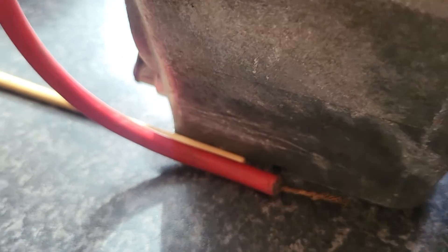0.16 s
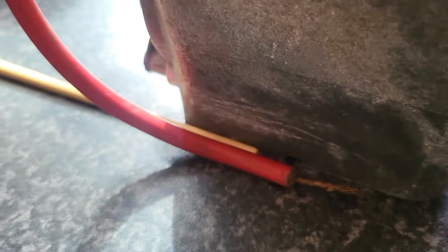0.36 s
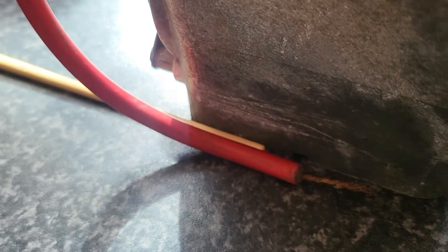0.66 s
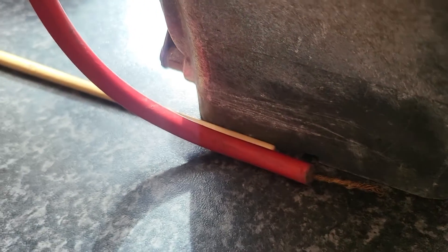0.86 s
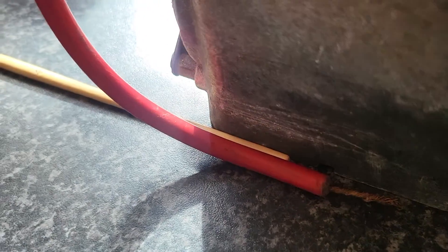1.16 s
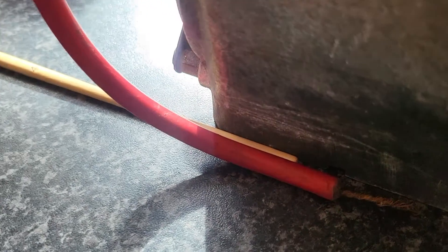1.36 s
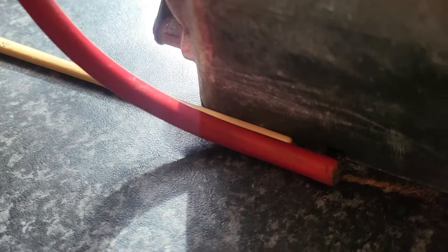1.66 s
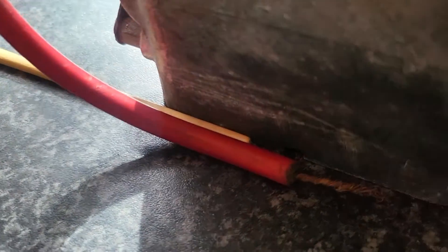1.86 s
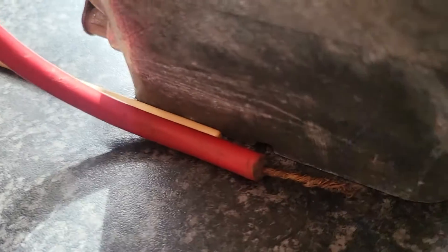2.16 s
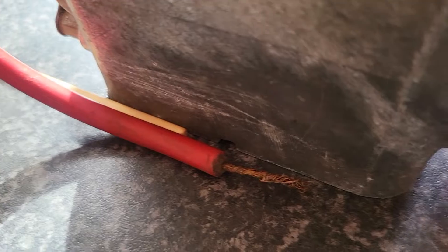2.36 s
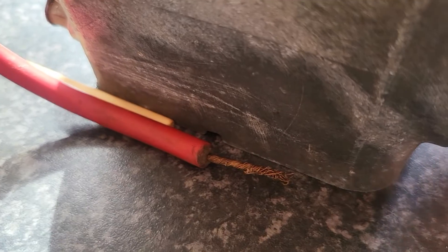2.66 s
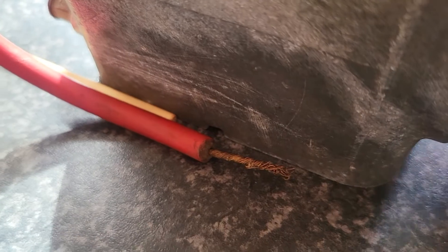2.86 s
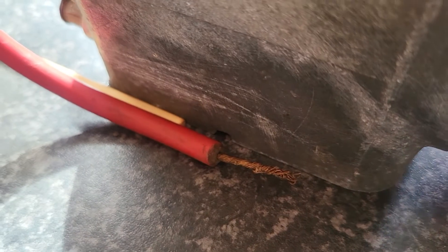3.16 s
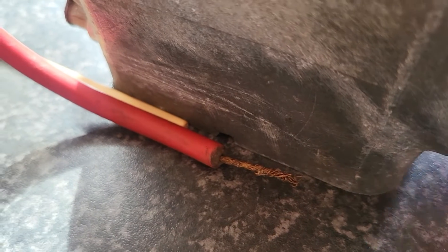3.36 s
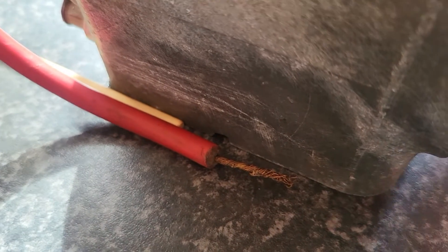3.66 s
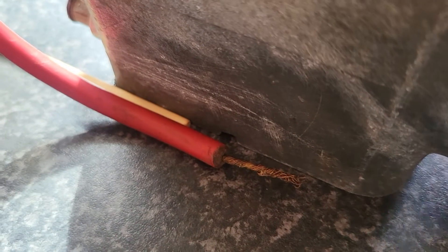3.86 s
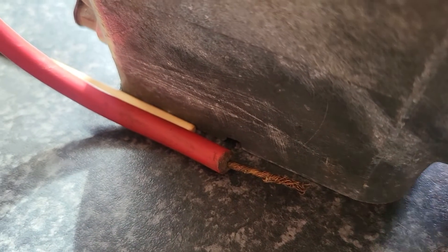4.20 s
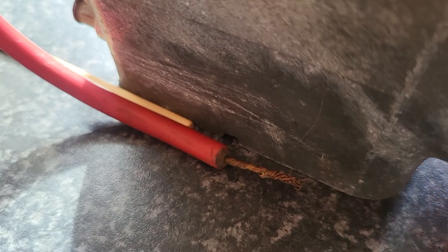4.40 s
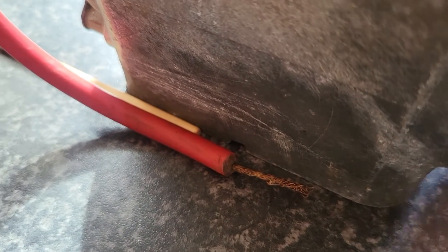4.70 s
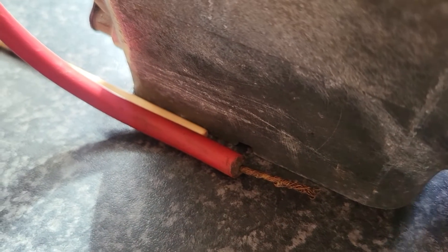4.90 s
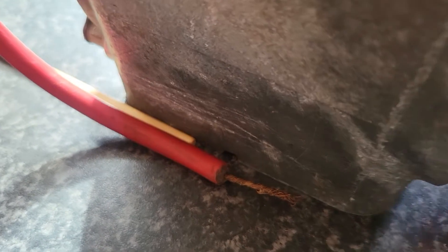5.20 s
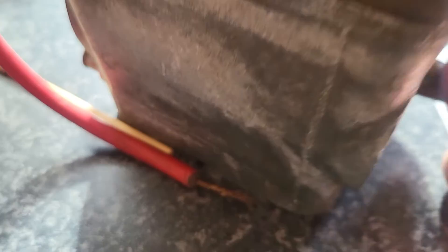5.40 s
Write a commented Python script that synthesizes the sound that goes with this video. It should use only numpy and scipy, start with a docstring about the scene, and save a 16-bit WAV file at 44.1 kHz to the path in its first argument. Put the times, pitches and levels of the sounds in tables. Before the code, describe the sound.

Very close to the microphone, a magneto is turned by hand on a bench in short rasping pushes, about three a second. Gear ticks come first; from 0.9 seconds nearly every push ends with a small breaker click and a hard, bright spark crack. Low thuds follow, some bumping the microphone, over faint room rumble and a short room tail.

```python
"""A magneto is turned by hand on a workbench, close to a phone. Over a low room rumble, each push of
the hand excites slip noise and housing modes, and a faint drone grows; gear teeth and breaker tick.
As the armature flips, a spark cracks across a small gap between lead and housing: a shock front,
scattered noise and a bark. Some sparks jolt the microphones into a brief low swing, while decaying
bench modes thud. The small room answers ticks and sparks with a short decaying noise tail."""
import sys
import numpy as np
from scipy import signal
from scipy.fft import rfft, irfft
from scipy.io import wavfile
from scipy.ndimage import uniform_filter1d

SR = 44100
rng = np.random.default_rng(int(sys.argv[2]) if len(sys.argv) > 2 else 0)


def master(y):
    """Save y as 16-bit WAV."""
    cut = np.clip(np.atleast_2d(y).T, -1, 1)
    pcm = np.round(cut * 32767)  # scale
    wavfile.write(sys.argv[1], SR, pcm.astype(np.int16))


N = 244314  # length in samples

# Pushes of the hand: start t/s, spin-up t/s, held t/s, run-down t/s, gear rub level/dB,
# dry sliding hiss level/dB
PUSHES = [(0.0, 0.045, 0.048, 0.34, -41.5, -62.5), (0.37, 0.062, 0.089, 0.2, -41.5, -64.5),
          (0.699, 0.054, 0.063, 0.27, -40, -52.5), (1.038, 0.061, 0.055, 0.24, -42.5, -58),
          (1.409, 0.07, 0.024, .38, -42, -56), (1.816, 0.08, 0.005, 0.39, -42.5, -58),
          (2.21, 0.098, 0.041, 0.28, -49, -66), (2.55, 0.077, 0.017, 0.24, -47, -56.5),
          (2.73, 0.063, 0.15, 0.36, -70.5, -68), (2.921, 0.095, 0.07, 0.28, -46, -56.5),
          (3.282, 0.11, 0.021, .33, -44.5, -55), (3.62, 0.091, 0.024, 0.36, -46, -53.5),
          (3.98, 0.087, 0.03, 0.39, -43.5, -53), (4.308, 0.07, 0.079, 0.29, -44.5, -56.5),
          (4.654, 0.055, 0.14, 0.29, -46, -59), (5.064, 0.045, 0.065, 0.39, -41, -51),
          (5.36, 0.11, 0.038, .2, -48.5, -59.5)]
RUB_POWER, HISS_POWER = 2.43, 2.3  # amplitude grows as speed to this power
REST_SPEED = 0.022  # fraction of full speed; the armature never quite stands still
# Extra rub as the poles resist before a flip: level/dB, build-up t/s, release t/s
MAGNET_DB, MAGNET_S, RELEASE_S = 9, 0.059, 0.0058
FIRM_DB = -42  # gear rub of a firm push, level/dB

# Housing resonances: f/Hz, nominal width f/Hz, relative level/dB, left minus right level/dB
HOUSING_MODES = [(672.5, 40, 7.5, -0.5), (880, 87, 1.5, 5.5), (998, 50, 6.5, 0), (1207, 400, -4.5, -0.5),
                 (1445, 100, -7, -2.5), (1865, 200, -3, 11.5), (2041, 340, -2.5, 2), (2540, 190, -14, -4.5),
                 (2618, 120, -7.5, 3.5)]
# Spectrum of the gear and bearing rub: f/Hz, level/dB
RUB_SPECTRUM = [(100, -4), (300, -2.5), (500, 0.5), (800, 1.5), (1300, -5.5), (1620, -8), (2300, -9.5),
                (3000, -18.5), (4500, -23), (9000, -45.5)]
# Spectrum of the dry sliding hiss: f/Hz, level/dB
HISS_SPECTRUM = [(1500, -7.5), (3200, -2.5), (5000, -8), (7400, -4.5), (9000, -16), (12000, -12),
                 (15500, -17), (16500, -31.5)]
# Spectrum of the room rumble: f/Hz, level/dB
AIR_SPECTRUM = [(20, -11), (50, 1.5), (110, 0), (200, -11), (350, -15.5), (700, -22.5), (1200, -36),
                (3000, -36), (8000, -47.5), (15500, -49.5)]

# Gear teeth taking up their slack: t/s, snap level/dB, housing knock level/dB
GEAR_TICKS = [(0.199, -8, -7.5), (0.382, -38, -2.5), (0.43, -8.5, -32), (0.450, -34, -1), (0.550, -6, -4.5),
              (0.711, -29, -1.5), (0.781, -33.5, 2.5), (1.395, -17.5, -18.5), (4.526, -6.5, -9.5)]
# The breaker snaps once before each spark, earlier when the hand pauses in between: t/s
BREAKER_SNAPS = [0.845, 1.157, 1.508, 1.884, 2.149, 2.625, 3.06, 3.406, 3.735, 4.064, 4.28, 4.874, 5.211,
                 5.47]
BREAKER_SNAP_DB, BREAKER_KNOCK_DB = -2, -3  # relative level/dB under a firm push
SNAP_PER_PUSH, KNOCK_PER_PUSH = 0.53, 0.8  # dB per dB of the push
# Spectrum of the snap: f/Hz, level/dB
SNAP_SPECTRUM = [(1500, -12.5), (3500, -29.5), (5000, 9.5), (6400, 4), (7500, 7.5), (9000, -17.5),
                 (12000, -9.5), (16000, -15)]
# Spectrum of the room's answer: f/Hz, level/dB
ROOM_SPECTRUM = [(150, 0), (500, -2.5), (1000, -11), (2000, -7), (4000, -5.5), (7000, -1.5), (9000, -7.5),
                 (13500, -1), (15500, -10), (16500, -28)]

# Sparks: t/s, crack level/dB, extra treble level/dB, bark of the gap level/dB, bark f/Hz, # bench knock
# level/dB, left minus right level/dB, bench thud level/dB (levels relative)
SPARKS = [(0.9030, -4.5, -13, -12, 1920, -0.5, 5.5, 4.5), (1.212, -20.5, -29, -28, 1830, -16.5, -15, 5),
          (1.5510, -8.5, -5.5, 4.5, 1205, 4, -3, 8.5), (1.9255, -6.5, 6.5, 0, 1914, -7.5, 3, 0.5),
          (2.2959, -2.5, -8, -2, 2660, 4.5, 3, 1), (2.6746, -3, -0.5, 4, 2200, -6.5, 1.5, 3),
          (3.1123, -8, 9, -4, 1780, -4, 0, 2), (3.4550, -6, 5.5, 4.5, 1407, 5.5, -2, 5),
          (3.7810, -2.5, 0, -3.5, 1900, -4.5, -4.5, -4), (4.1043, -5.5, 9, -2.5, 1900, 2, -3, -1),
          (4.3718, -7.5, 4, -1, 1320, 0, -3, -1.5), (5.1078, -3.5, -6, 0.5, 2240, -10, -4, 4),
          (5.2547, -4, 0, 4.5, 1790, -10.5, 2, -4.5), (5.5280, -11, 1.5, 5.5, 1600, -2, 6, 0.5)]
# Spectrum of the crack: f/Hz, level/dB
CRACK_SPECTRUM = [(100, -12.5), (400, 1), (1000, -11.5), (2200, -11), (3200, -6), (4200, -2), (6500, 3),
                  (8500, -4), (11000, -1), (14000, -0.5), (16000, -8)]
# Microphone jolts: t/s, left level/dB, right level/dB, left swing f/Hz, right swing f/Hz
JOLTS = [(0.9030, -21, -10.5, 47, 46), (1.5510, -6, -1, 55.7, 37.2), (1.9254, -9, -5, 34.8, 41.5),
         (2.2981, -2, -19.5, 54, 65.3), (3.454, -3, 0, 56, 36), (4.37, -9, -5, 66.7, 44),
         (5.1066, -3, -3.5, 37, 66.3)]
# Bench modes: nominal f/Hz, 60 dB decay t/s, nominal relative level/dB
BENCH_MODES = [(48.8, 0.27, 3.5), (97.1, 0.29, -3), (116.4, 0.29, -2.5), (150.4, 0.25, -4.5),
               (190.2, 0.16, -2.5), (223, 0.26, -13), (314.8, 0.11, -10.5)]
TOP_HZ = 16500  # upper limit of the phone's band, f/Hz


def undb(db):
    """Amplitude ratio: gain is ten to the power of level/dB over 20."""
    return 10 ** (np.asarray(db) / 20)


def unit(x):
    """Normalisation to a root mean square of 1."""
    return x / np.sqrt(np.mean(x ** 2))


def unit_energy(x):
    """Normalisation of each channel to energy 1."""
    return x / np.sqrt(np.sum(x ** 2, axis=-1, keepdims=True))


def add(out, s, sound):
    """Superposition: a sound is added into the mix from time s."""
    i = max(int(s * SR), 0)
    out[:, i:i + sound.shape[-1]] += sound[..., :N - i]


def pan(left_minus_right_db):
    """Level difference: shared equally, with opposite sign, between left and right gains."""
    return undb(np.array([[left_minus_right_db], [-left_minus_right_db]]) / 2)


def colour(x, points, size=2048):
    """Minimum-phase filtering: a folded cepstrum turns a magnitude spectrum into a causal response."""
    hz, db = np.transpose(points)
    f = np.maximum(np.arange(size // 2 + 1) * SR / size, 1)
    log_gain = np.log(undb(np.interp(np.log(f), np.log(hz), db)))
    cepstrum = irfft(log_gain)
    cepstrum[1:size // 2] *= 2
    cepstrum[size // 2 + 1:] = 0
    response = irfft(np.exp(rfft(cepstrum)))
    return signal.fftconvolve(x, response[None], axes=-1)[:, :x.shape[-1]]


def resonate(x, hz, width):
    """Second-order resonance: gain is 1 at the centre and falls on either side."""
    return signal.lfilter(*signal.iirpeak(hz, hz / width, fs=SR), x)


def brighten(x, db, hz=9000):
    """Treble shelf: the part above a first-order corner is added with a weight."""
    treble = signal.sosfilt(signal.butter(1, hz, "high", fs=SR, output="sos"), x)
    return x + (undb(db) - 1) * treble


def walk(rate):
    """Smoothed random steps: a moving average joins them into a wander of unit rms."""
    k = int(SR / rate)
    steps = np.repeat(rng.standard_normal(N // k + 1), k)
    return unit(uniform_filter1d(steps, k)[:N])


def pushes():
    """Driven rotation: each push spins up and holds, friction slows evenly; speed sets rub and hiss/dB."""
    t, rub, hiss, load = np.arange(N) / SR, 0, 0, 0
    for s, up_s, held_s, down_s, rub_db, hiss_db in PUSHES:
        corners = s + np.cumsum([0, up_s, held_s, down_s])
        speed = np.interp(t, corners, [REST_SPEED, 1, 1, REST_SPEED])
        rub = np.maximum(rub, undb(rub_db) * speed ** RUB_POWER)
        hiss = np.maximum(hiss, undb(hiss_db) * speed ** HISS_POWER)
    # the magnets load the gears more and more until the armature flips
    for s, *_ in SPARKS:
        load = np.maximum(load, np.exp(-np.maximum((s - t) / MAGNET_S, (t - s) / RELEASE_S)))
    return 20 * np.log10(rub) + MAGNET_DB * load, 20 * np.log10(hiss)


def housing(x, wander_db=0):
    """Modal superposition: the cast body rings; as the contact shifts, modes flare and fade separately."""
    rings = 0
    for k, (hz, width, db, pan_db) in enumerate(HOUSING_MODES):
        gain = pan(pan_db) * undb(db + wander_db * walk(22)[:x.shape[-1]])
        mode = resonate(resonate(x, hz, 0.59 * width), hz, 2.7 * width)
        rings = rings + gain * mode * (-1) ** k  # neighbouring modes have opposite sign
    return unit(rings)


def rubbing(push_db, slide_db, ring_db=-1, rub_db=-6, hiss_db=1, grit_db=2.0, flutter_db=2.5,
            hiss_pan_db=-3, sing_db=-10, bite=0.97):
    """Stick-slip friction: tiny slips in gears and bearings ring the housing, swelling with each push."""
    slips = rng.standard_normal((4, 2, N)) * undb(grit_db * walk(1100) + flutter_db * walk(80))
    body = undb(ring_db) * housing(slips[0], wander_db=3)
    body += undb(rub_db) * unit(colour(slips[1], RUB_SPECTRUM))
    # a firm push makes the gear wheel sing, mostly towards the left
    wheel = unit(resonate(resonate(slips[3], hz=1910, width=160), hz=1880, width=420))
    wheel = wheel * undb([[0], [-5]])
    body += wheel * undb(sing_db + bite * (push_db - FIRM_DB) + 2 * walk(34))
    hiss = unit(colour(slips[2], HISS_SPECTRUM)) * undb(hiss_db) * pan(hiss_pan_db)
    return undb(push_db) * body + undb(slide_db) * hiss


def background(push_db, air_db=-58, side_db=-7, hum_hz=680, hum_width=45, hum_db=-62, hum_full_s=2,
               hum_follows=0.37):
    """Partly coherent noise: rumble mostly alike in both ears, and a resonant drone swelling with pushes."""
    noise = rng.standard_normal((3, N))
    shared = noise[0] + undb(side_db) * noise[1:]
    air = unit(colour(shared, AIR_SPECTRUM, size=8192)) * undb(3.1 * walk(5.6))
    drone = resonate(rng.standard_normal((2, N)), hum_hz, hum_width)
    drone = unit(resonate(drone, hum_hz, 2 * hum_width))
    drone_db = hum_db + hum_follows * (push_db - FIRM_DB) + 1.3 * walk(11)
    growth = np.minimum(np.arange(N) / SR / hum_full_s, 1) ** 2
    return undb(air_db) * air + undb(drone_db) * drone * growth


def burst(decay_s, size=4096):
    """Scattering: nearby surfaces turn a blow into decaying noise, different at each microphone."""
    return rng.standard_normal((2, size)) * np.exp(-np.arange(size) / SR / decay_s)


def room(x, t60, wet_db, build_s=0.0022):
    """Diffuse reverberation: a small workshop answers with a dense, bright, short exponential tail."""
    t = np.arange(SR // 2) / SR
    tail = colour(rng.standard_normal((2, len(t))), ROOM_SPECTRUM)
    tail = tail * undb(-60 * t / t60) * (1 - np.exp(-t / build_s))
    return undb(wet_db) * signal.fftconvolve(x, unit_energy(tail), axes=-1)[:, :N]


def ticks(push_db, snap_db=-19, knock_db=-11, ping_db=-3):
    """Impact excitation: breaker (harder under a firm push) and gear teeth snap and knock the housing."""
    out, breaker = np.zeros((2, N)), []
    for s in BREAKER_SNAPS:
        force = push_db[int(s * SR)] - FIRM_DB
        snap = BREAKER_SNAP_DB + SNAP_PER_PUSH * force
        knock = BREAKER_KNOCK_DB + KNOCK_PER_PUSH * force
        breaker.append((s, snap, knock))
    for s, snap, knock in breaker + list(GEAR_TICKS):
        blow = burst(decay_s=0.0015)
        ping = unit_energy(resonate(blow, hz=2046, width=27))
        body = unit_energy(housing(blow)) + undb(ping_db) * ping
        add(out, s, undb(snap_db + snap) * unit_energy(colour(blow, SNAP_SPECTRUM)))
        add(out, s, undb(knock_db + knock) * unit_energy(body))
    return out + room(out, t60=0.047, wet_db=-8)


def sparks(crack_db=8.0, front_db=3, bark_db=3, bark_width=720, pop_db=-4, pop_hz=550, pop_width=650,
           hold_s=0.0027, sustain_s=0.0014, bounce_s=0.0048, bounce_db=-22):
    """Shock radiation: a front rattles between housing and bench, then spreads into the room."""
    near, far = np.zeros((2, N)), np.zeros((1, N))
    shock = signal.unit_impulse((1, 4096), (0, 8))
    front = -unit_energy(colour(shock, CRACK_SPECTRUM))
    # a short knock of the bench
    pop = unit_energy(resonate(resonate(shock, pop_hz, pop_width), pop_hz, 2 * pop_width))
    for s, db, top_db, gap_db, bark_hz, bench_knock_db, pan_db, _ in SPARKS:
        rattle = burst(decay_s=0.0007)
        # the first reflections stay strong
        rattle *= np.exp(np.minimum(np.arange(rattle.shape[1]) / SR, hold_s) / sustain_s)
        crack = undb(front_db) * front + undb(crack_db) * unit_energy(colour(rattle, CRACK_SPECTRUM))
        crack = brighten(crack, top_db)
        bark = resonate(burst(decay_s=0.0001), bark_hz, bark_width)
        bark = unit_energy(resonate(bark, bark_hz, 3 * bark_width))
        sound = undb(db) * crack + undb(bark_db + gap_db) * bark + undb(pop_db + bench_knock_db) * pop
        sound = sound * pan(pan_db)
        add(near, s, sound)
        # off something across the bench, with left and right exchanged
        add(near, s + bounce_s, undb(bounce_db) * sound[::-1])
        add(far, s, brighten(undb(db) * signal.unit_impulse((1, 64)), top_db / 2))
    return near + room(far, t60=0.18, wet_db=-3.0)


def jolts(rise_s=0.0013, decay_s=0.014, onset_s=0.0012, lead_turns=0.55, lead_s=0.0015, ring_hz=760,
          ring_s=0.00014, ring_db=-5, swing_db=0):
    """Damped oscillation: some sparks throw the microphones oppositely; they ring, then swing back."""
    out, t = np.zeros((2, N)), np.arange(SR // 5) / SR
    late = np.maximum(t - onset_s, 0)
    for s, left_db, right_db, left_hz, right_hz in JOLTS:
        size = undb([[left_db], [right_db]]) * [[1], [-1]]
        # phase in cycles: the lead makes the swing start fast
        turns = np.array([[left_hz], [right_hz]]) * late + lead_turns * (1 - np.exp(-late / lead_s))
        swing = np.sin(2 * np.pi * turns) * np.exp(-late / decay_s)
        ring_envelope = (t / rise_s) * np.exp(1 - t / rise_s - (t / ring_s / 2) ** 2)
        ring = np.sin(2 * np.pi * ring_hz * t) * ring_envelope
        ring_size = np.sign(size) * np.sqrt(np.abs(size))
        add(out, s, undb(swing_db) * size * swing + undb(ring_db) * ring_size * ring)
    return out


def thuds(thud_db=-35, build_cycles=1.3, rumble_db=-47, rumble_s=0.079):
    """Modal decay: the armature snaps past its poles; low bench modes build slower, so the thud sinks."""
    out, t = np.zeros((2, N)), np.arange(SR // 2) / SR
    for s, *_, db in SPARKS:
        modes = 0
        for hz, t60, mode_db in BENCH_MODES:
            level_chance, pitch_chance, phase = rng.standard_normal(3)
            envelope = undb(mode_db + 2 * level_chance - 60 * t / t60)
            envelope = envelope * (1 - np.exp(-hz * t / build_cycles))
            modes = modes + envelope * np.sin(2 * np.pi * (hz * (1 + 0.037 * pitch_chance) * t + phase))
        rumble = resonate(rng.standard_normal((2, len(t))), hz=109, width=110)
        rumble = unit(resonate(rumble, hz=107, width=76)) * np.exp(-t / rumble_s)
        add(out, s, undb(db) * (undb(thud_db) * modes + undb(rumble_db) * rumble))
    return out


def scene():
    """Linear superposition: sparks and their recoil over the turning magneto and the room."""
    push_db, slide_db = pushes()
    strokes = sparks() + ticks(push_db) + jolts() + thuds()
    return strokes + rubbing(push_db, slide_db) + background(push_db)


def record(dry):
    """Saturation and band limit: the phone clips the tips of the cracks and cuts the top."""
    clipped = np.clip(dry, -0.85, 0.85)
    return signal.sosfilt(signal.ellip(8, 0.2, 70, TOP_HZ, fs=SR, output="sos"), clipped)


dry = scene()
out = record(dry)
master(out)
```